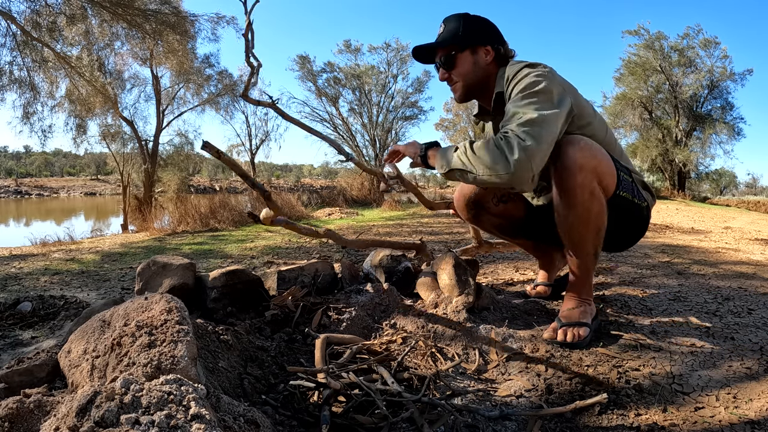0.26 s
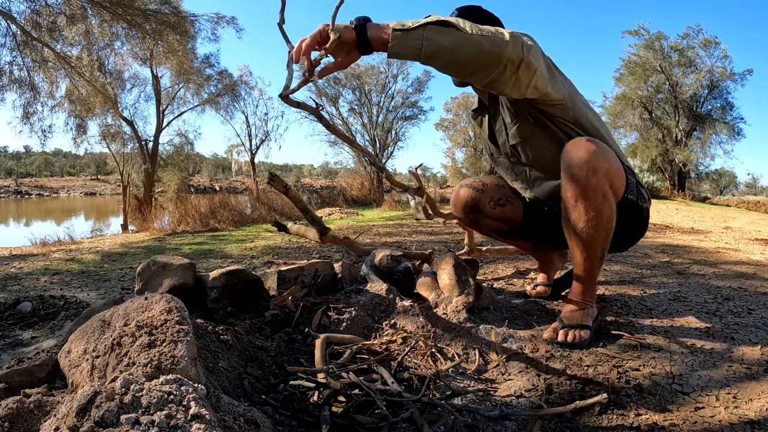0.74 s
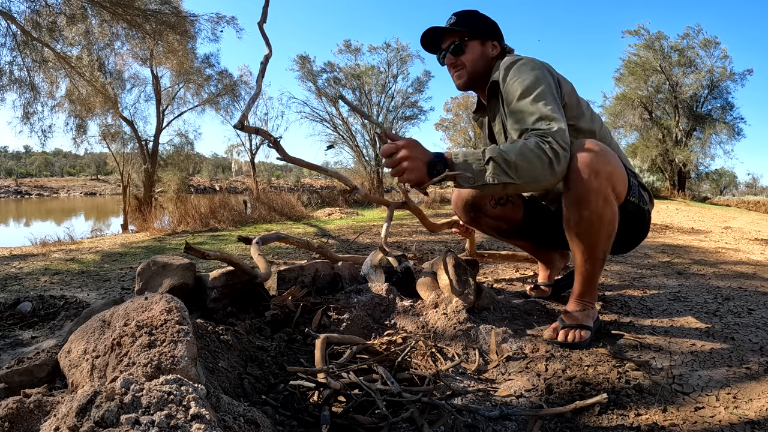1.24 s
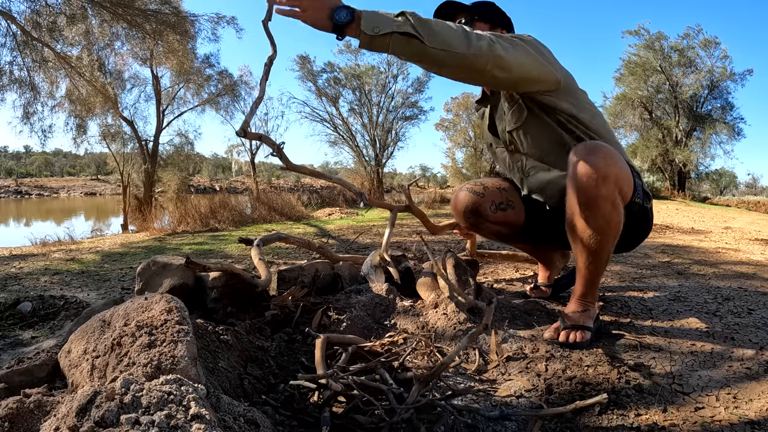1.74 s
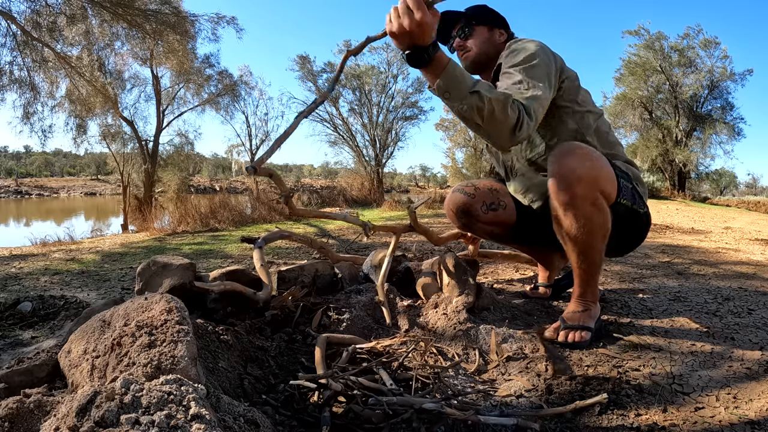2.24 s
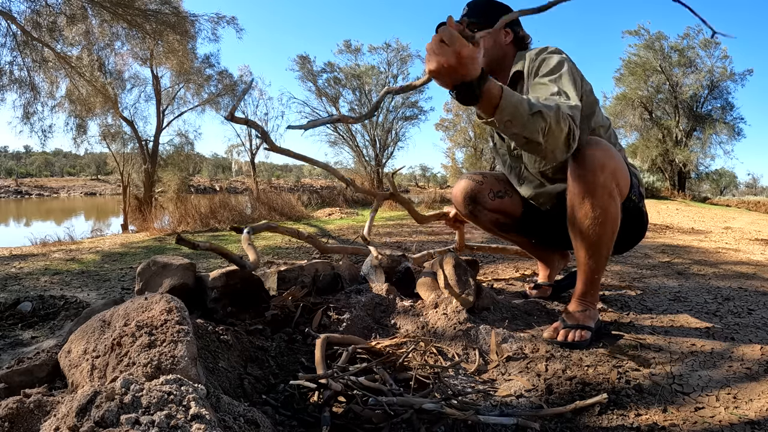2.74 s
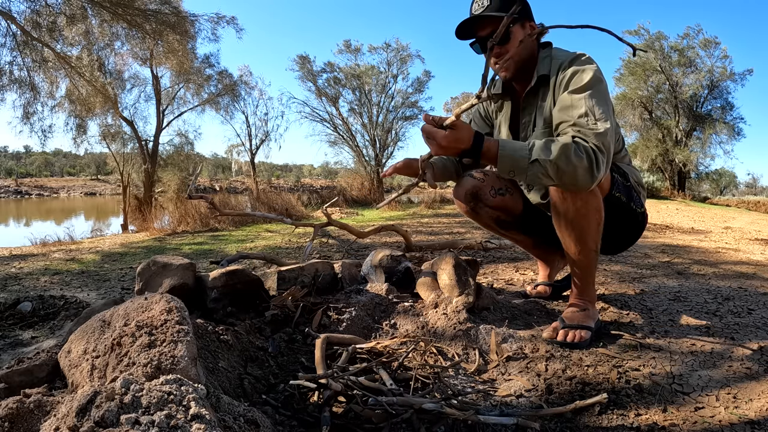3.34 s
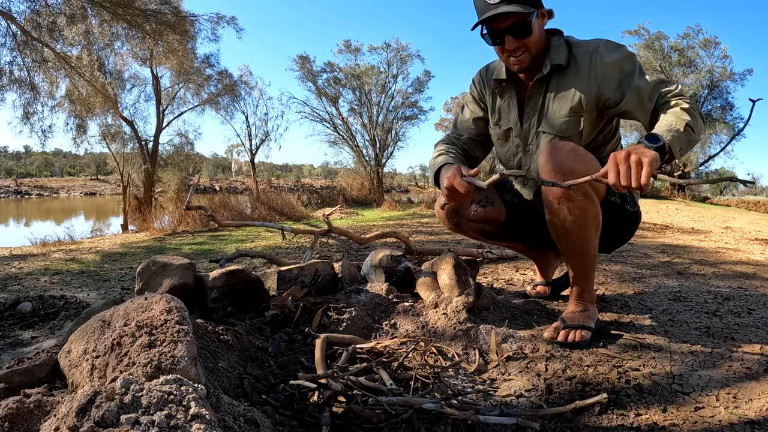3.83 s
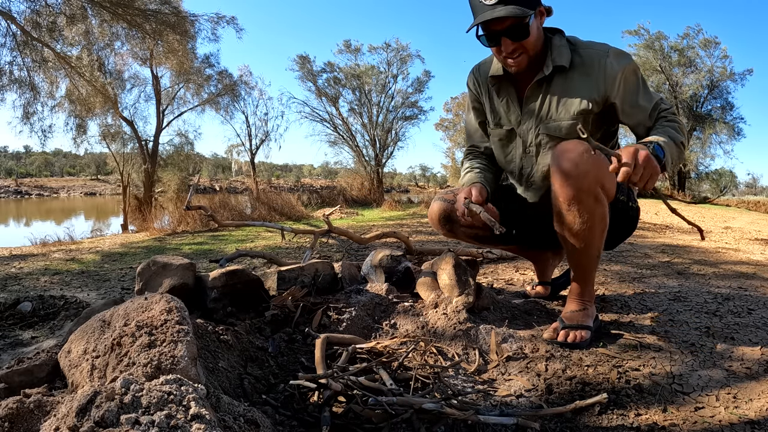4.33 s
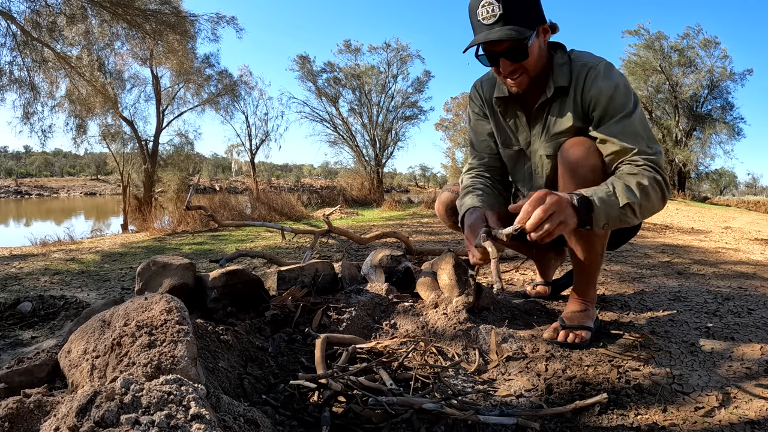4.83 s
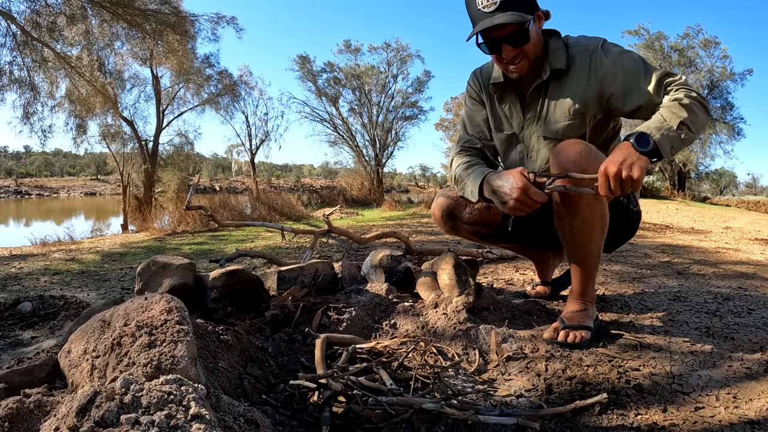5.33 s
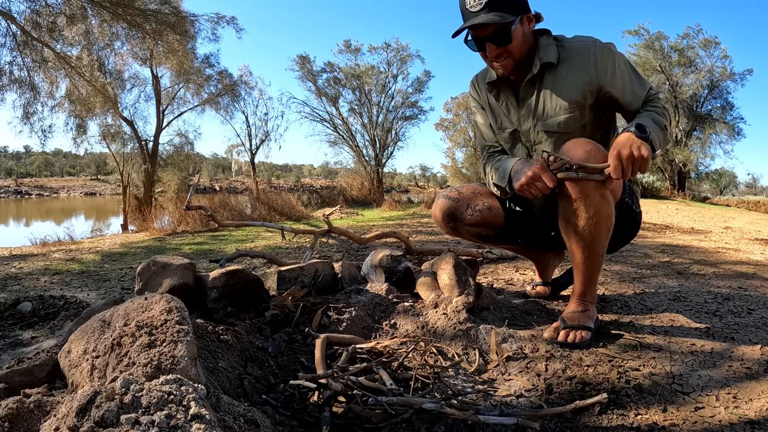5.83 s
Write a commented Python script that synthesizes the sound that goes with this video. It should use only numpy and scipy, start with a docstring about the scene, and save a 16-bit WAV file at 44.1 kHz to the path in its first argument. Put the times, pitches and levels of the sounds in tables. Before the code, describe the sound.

Dry sticks snap and rustle beside a stone fire pit outdoors, sharp cracks over dull thuds, a low ground rumble and quiet air.

```python
"""Sharp cracks of dry wood and rustling bark stand out over dull thuds, a low rumble and quiet open air.
Sticks are pulled over the ground, snapped and dropped into a stone fire pit, close to a small camera.
Noise bursts make the cracks, clumped clicks the rustle and scraping, and resonances ring the wood and ground.
The loudest cracks overload the microphone, which answers with a low push."""
import sys
import numpy as np
from scipy import signal
from scipy.fft import rfft, irfft, next_fast_len
from scipy.io import wavfile
from scipy.ndimage import uniform_filter1d

SR = 44100
rng = np.random.default_rng(int(sys.argv[2]) if len(sys.argv) > 2 else 0)


def waveform_to_disk(signal):
    """Save audio, clipped to [-1, 1], as 16-bit WAV at the path in sys.argv[1]."""
    frames = np.transpose(np.atleast_2d(signal))
    scaled = np.clip(frames, -1, 1) * 32767
    samples = np.round(scaled).astype(np.int16)
    wavfile.write(sys.argv[1], SR, samples)


def level_to_linear(level):
    """Convert decibel levels to linear amplitude factors, elementwise."""
    exponent = np.asarray(level, float) / 20
    return 10 ** exponent


N = 267819  # length in samples

# How busily the wood is handled, a bed under the single strokes and slides.
# Each row: time in seconds, relative level in dB.
BUSY = [(.56, -88), (.6, -66), (1.45, -68), (1.58, -58.5), (2.05, -56.5), (2.42, -61), (2.72, -56),
        (2.9, -59.5), (2.97, -80), (3.17, -75.5), (3.3, -59), (3.4, -73), (3.44, -57), (3.72, -59),
        (3.82, -68), (4.15, -71), (4.6, -66), (5.06, -75), (5.15, -64), (5.62, -69), (5.72, -58)]


def evened(x):
    """Scales a signal to an rms of 1."""
    return x / np.sqrt(np.mean(x ** 2) + 1e-20)


def smooth_patches(x, rows, columns):
    """Averages a random grid over so many rows and columns, leaving soft patches of rms 1."""
    return evened(uniform_filter1d(uniform_filter1d(x, size=rows, axis=0), size=columns, axis=1))


def read(points, hz):
    """Reads a table of (Hz, value) at any frequencies, with straight lines over log frequency."""
    f, value = np.transpose(points)
    return np.interp(np.log(hz + 1), np.log(f + 1), value)


def curves(rows):
    """Turns each column of a time table into a curve with one value a sample."""
    s, *columns = np.transpose(rows)
    return [np.interp(np.arange(N) / SR, s, c) for c in columns]


def add(mix, s, sound):
    """Mixes a sound in at s seconds."""
    part = mix[round(s * SR):][:len(sound)]
    part += sound[:len(part)]


def colour(x, points):
    """Filters to a spectrum given as (Hz, dB), with no sound ahead of its cause (minimum phase)."""
    log_gain = np.log(level_to_linear(read(points, abs(np.fft.fftfreq(4096, 1 / SR)))))
    taps = np.fft.ifft(np.exp(np.conj(signal.hilbert(log_gain)))).real[:2048]
    taps = taps.reshape((1,) * (x.ndim - 1) + (-1,))
    return signal.oaconvolve(x, taps, axes=-1)[..., :x.shape[-1]]


def resonate(x, hz, width):
    """A resonance with a gain of about 1 at its pitch; a narrower width in Hz rings longer."""
    pole = np.exp((2j * np.pi * hz - np.pi * width) / SR)
    return 2 * signal.lfilter([1 - abs(pole)], [1, -pole], x).real


def grains(per_s, spread_db, clump_db):
    """Random clicks of uneven size that get larger and smaller in clumps, rms 1."""
    clumps = evened(uniform_filter1d(rng.standard_normal(N), size=250))
    size = level_to_linear(spread_db * np.minimum(rng.exponential(1, N), 5) + clump_db * clumps)
    return evened(size * rng.choice([-1., 1.], N) * (rng.random(N) < per_s / SR))


def swells(rows):
    """Gain of strokes (peak s, dB, s to rise 20 dB, s to fall 20 dB), straight in dB; powers add."""
    t, power = np.arange(0, N + 32, 32) / SR, 1e-12
    for s, db, rise, fall in rows:
        power = power + level_to_linear(db - 20 * np.maximum((s - t) / rise, (t - s) / fall)) ** 2
    return np.interp(np.arange(N) / SR, t, np.sqrt(power))


def air():
    """Quiet open air: noise with drifting patches of level, partly shared by both microphone ports."""
    # Spectrum of the air. Each row: frequency in Hz, relative level in dB per Hz.
    spectrum = [(18, 0), (34, 8), (56, -14), (80, -24), (118, -18), (150, 5), (649, -18), (1350, -8.5),
                (3300, -28), (5300, -18), (10500, -31.5), (13000, -29.5), (15000, -62)]
    # How alike left and right are. Each row: frequency in Hz, likeness from 0 to 1.
    likeness = [(60, 0.992), (240, 0.51), (950, 0.29), (3770, 0.51), (15000, 0.68)]
    frames, hz = N // 256 + 5, np.fft.rfftfreq(1024, 1 / SR)
    a, b, c, d, grid = rng.standard_normal((frames, 513, 5)).T
    patches = smooth_patches(grid, 12, 14)
    drift = smooth_patches(patches, 50, 50)  # slow, broad shifts
    same = np.clip(read(likeness, hz), -1, 1)[:, None]
    left = a + 1j * b
    right = same * left + np.sqrt(1 - same ** 2) * (c + 1j * d)
    z = np.array([left, right])
    z *= level_to_linear(read(spectrum, hz)[:, None] + 1.6 * patches + 2.2 * drift)
    return level_to_linear(-64) * evened(signal.istft(z, nperseg=1024, noverlap=768)[1][:, :N])


def rumble():
    """The dragged branch shakes the ground: noise swings two modes of the camera's seat fairly evenly."""
    # Modes of the camera on the ground. Each row: frequency in Hz, width of the first resonance in Hz.
    modes = [(40, 24), (73, 10)]
    # Shakes of the ground. Each row: peak time in seconds, low mode level in dB, high mode level in dB,
    # seconds to rise 20 dB, seconds to fall 20 dB.
    shakes = [(.13, -43, -71, 0.25, .3), (.42, -47, -43, 0.21, 0.32), (.7, -35, -43, 0.16, 0.3771),
              (.94, -42, -46, 0.25, .5), (1.14, -35, -41, 0.22, 0.3222), (1.32, -39, -41, 0.29, 0.29),
              (1.5, -48, -44, 0.35, 0.2129), (1.9, -54, -46, .09, .16), (2.38, -45, -44, 0.21, 0.5),
              (2.64, -39, -38.5, 0.58, 0.54), (2.83, -39, -40.5, 0.28, 0.0528),
              (3.43, -35.5, -45.5, 0.1372, 0.626), (3.72, -39, -42, .6, 0.2866),
              (4.2, -45.5, -64.5, .02, 0.2125), (5.88, -50.5, -72, 0.27, 0.38)]
    noise = rng.standard_normal((2, 2, N))
    out = np.zeros((2, N))
    for k, ((hz, width), pair) in enumerate(zip(modes, noise)):
        shared, opposed = (evened(resonate(resonate(v, hz, width), hz, 2.9 * width)) for v in pair)
        envelope = abs(signal.hilbert(shared, next_fast_len(N))[:N])
        shared = evened(shared / (envelope + 0.16) ** .7)  # evens out the swing
        level = swells([(s, db[k], rise, fall) for s, *db, rise, fall in shakes])
        # the right port feels more
        out += level * np.array([0.795 * shared + .14 * opposed, 1.085 * shared - .14 * opposed])
    return out


def rustle(breaks):
    """Dense tiny scrapes of bark, their colour shifting; the second row reaches the ports unalike."""
    # Bark and twigs rubbing. Each row: peak time in seconds, relative level in dB,
    # seconds to rise 20 dB, seconds to fall 20 dB.
    rubs = [(0.001, -54, 1.25, 0.31), (.27, -53, 0.1035, 0.14), (.73, -44.5, 0.0557, 0.0937),
            (.791, -41, 0.1033, 0.0271), (.945, -33.5, 0.0222, 0.0649), (.965, -36.5, 0.0955, 0.0151),
            (1.031, -38, 0.018, 0.16), (1.142, -34.5, 0.0172, 0.03), (1.25, -53, 0.0674, 0.15),
            (1.325, -50.5, 0.0333, .08), (1.43, -51, 0.127, 0.03), (1.709, -38.5, .018, 0.1027),
            (1.805, -40, 0.0379, 0.1356), (2.132, -42, 0.1521, 0.13), (2.475, -31.5, 0.0295, 0.0415),
            (2.569, -38, 0.0333, 0.0439), (3.369, -48.5, 0.182, 0.017), (3.537, -49, 0.14, .21),
            (3.737, -50.5, 0.34, 0.0568), (4.18, -38, 0.0186, 0.03), (4.74, -43, 0.0118, 0.0471),
            (4.766, -44.5, 0.0327, .03), (4.93, -50, 0.1025, 0.0336), (5.215, -47, 0.06, 0.1029),
            (5.293, -42, 0.0256, 0.0663), (5.934, -45, 0.025, 0.06)]
    # Spectrum of the rustle. Each row: frequency in Hz, gain in dB.
    spectrum = [(400, -37.5), (800, -18.5), (1200, -6), (3000, -4), (5000, -3), (7000, -5.5), (10800, -13),
                (13500, -25), (15500, -52)]
    # How thick the rubbing twigs are. Each row: time in seconds, gain of the lower rustle in dB.
    thickness = [(0, 2.5), (.8, -1), (.95, -8), (1.04, -1.5), (1.35, 5), (1.7, -3), (2.1, 2.5), (2.95, 4),
                 (4.25, -3), (5.0, 7.5), (5.2, -1), (5.35, 3), (5.5, -4)]
    thick_hz = 2800  # the thickness gain fades out around here
    flakes = np.diff(grains(240, 3.5, 2.5), prepend=0)  # single bark flakes pop thinly
    alike = grains(8000, 4.0, 3.3) + 0.37 * flakes
    rows = np.array([alike, .28 * grains(11000, 2.3, 2.6)])
    # bark crumbs rustle after each crack
    delay_s, debris_db, rise_s, fall_s = 0.0089, -38.5, .008, .04
    debris = [(c[0] + delay_s, c[1] + debris_db, rise_s, fall_s) for c in breaks]
    level = np.hypot(swells(rubs + debris), level_to_linear(curves(BUSY)[0]))
    hz, t, z = signal.stft(colour(rows * level, spectrum), SR, nperseg=256)
    low_share = 1 / (1 + (hz / thick_hz) ** 4)
    z = z * level_to_linear(np.outer(low_share, np.interp(t, *np.transpose(thickness))))
    patches = smooth_patches(rng.standard_normal(z.shape[1:]), 10, 7)
    return level_to_linear(7.5) * signal.istft(z * level_to_linear(3.1 * patches), nperseg=256)[1][:, :N]


def scrape():
    """Slower slips of heavy wood ring its hollow middle range; a bent branch groans once."""
    # Slides of thick wood. Each row: peak time in seconds, relative level in dB,
    # seconds to rise 20 dB, seconds to fall 20 dB.
    slides = [(.75, -48, .15, 0.117), (1.07, -40, .08, .08), (2.22, -50.5, .21, 0.277),
              (2.65, -41, .03, .06), (3.425, -52.5, .11, 0.093)]
    heavy_db = -8  # thick wood in the busy bed, relative to bark
    slips = grains(3000, 4.1, 2.4) * np.hypot(swells(slides), level_to_linear(curves(BUSY)[0] + heavy_db))
    wood = 1.1 * resonate(resonate(slips, 760, 420), 760, 420) + 0.82 * resonate(slips, 1210, 390)
    creak = (2.81, -59, .05, .11)  # the groan, same columns as the slides
    groan = swells([creak]) * evened(resonate(grains(4000, 2.0, 2.5), 750, 200))
    body = 3.45 * resonate(resonate(slips, 170, 260), 170, 260)
    return level_to_linear(10.0) * (wood + groan + body)


def thuds():
    """A dull blow: a gritty push rings one mode at the listed pitch and a broad woody band around 270 Hz."""
    # Branches knocking ground and stones. Each row: start in seconds, level in dB,
    # pitch of the mode in Hz, time in which it falls by 60 dB in seconds.
    knocks = [(0.259, -34.5, 190.4, 0.075), (0.585, -26, 169.5, 0.09), (1.074, -36, 640, 0.03),
              (1.812, -42.5, 223, 0.09), (2.171, -32, 182.5, 0.04), (2.283, -35, 170.4, 0.11),
              (2.458, -30, 420, .03), (2.482, -26, 190, 0.06), (2.577, -31, 200, 0.06),
              (3.052, -50, 570, .07), (3.27, -37, 299, 0.022), (3.293, -37, 190, .05),
              (3.334, -28, 165, 0.06), (3.421, -25, 95, 0.073), (3.424, -23, 380, .028),
              (3.71, -37.5, 139.5, 0.08), (5.784, -38, 450, 0.012)]
    out, t = np.zeros(N), np.arange(9000) / SR
    for (s, db, hz, t60), noise in zip(knocks, rng.standard_normal((len(knocks), len(t)))):
        blow = (.6 + noise) * t * np.exp(-t / 0.004)
        gritty = blow + .0004 * noise * np.exp(-t / .025)  # soil settles
        mode = resonate(gritty, hz, 2.2 / t60)
        wood = resonate(resonate(gritty, 270, 340), 270, 340)
        add(out, s, level_to_linear(db) * (mode / abs(mode).max() + 0.38 * wood / abs(wood).max()))
    return out


def blows():
    """Lists the cracks and the ticks of thin twigs and flakes; each tick has its own pitch and length."""
    # Cracks of wood. Each row: start in seconds, level in dB, length in seconds,
    # ring of the stick relative to the crack level in dB, ring pitch in Hz.
    large = [(.5838, -28.5, 0.0077, -15, 850), (.793, -23, 0.0347, -15.5, 2406),
             (1.046, -36.5, 0.0205, 5.5, 989), (1.1245, -25.5, 0.041, -10, 1932),
             (1.1399, -19.5, 0.0134, -22.5, 5940), (1.1813, 2.5, 0.01547, -17, 3700),
             (1.325, -33, 0.0143, -10, 7000), (1.4186, -29, 0.0248, -11.5, 2544),
             (1.5349, -44.5, 0.0138, 1.5, 2161), (1.6993, -28, 0.039, -14.5, 1500),
             (1.7091, -13.5, 0.0181, -28.5, 6230), (1.794, -24, 0.031, -25.5, 5670),
             (1.9778, -14, .016, -19, 1240), (2.1292, -25.5, .042, -6, 2600),
             (2.1336, -19, 0.0184, -13.5, 1066), (2.1651, -24, .033, -10, 2287),
             (2.2141, -16.5, 0.0164, -14.5, 1075), (2.224, -6.5, 0.0101, -18, 1250),
             (2.241, -24.5, 0.0213, -19, 1020), (2.2939, -26.5, 0.0213, -17.5, 910),
             (2.457, -1, 0.0311, -17.5, 6650), (2.5324, -25, 0.021, -15.5, 1920),
             (2.5665, -28.5, .026, -1, 2493), (2.6278, -9, 0.0152, -9.5, 3903),
             (2.6282, -23, .021, 10, 1770), (2.631, -32.5, 0.0465, 9, 1096), (2.632, -36, 0.0372, 11, 1290),
             (2.8022, -29, 0.02, -17, 1600), (2.913, -29, 0.0352, -18, 2550), (2.9556, -34, 0.018, 2, 2256),
             (2.957, -42, .024, 10, 1253), (3.0504, -20.5, 0.022, -10, 5200), (3.052, -34, 0.026, 8, 1700),
             (3.2717, -21, 0.0168, -17.5, 832), (3.2911, -31.5, 0.058, -10.5, 2405),
             (3.3295, -33.5, 0.027, -10.5, 1906), (3.4111, -26.5, 0.0248, -8.5, 1570),
             (3.6448, -32, 0.0217, -10.5, 1952), (3.9152, -29, 0.0188, -17.5, 3082),
             (4.1733, -12.5, 0.0289, -22, 5640), (4.1865, -1.5, 0.01503, -13, 2480),
             (4.2217, -26.5, 0.0228, -9.5, 2560), (4.7335, -34.5, 0.0219, -2, 1205),
             (4.7426, -33.5, 0.028, 3, 1246), (4.7897, -39.5, 0.0124, -3, 1230),
             (5.0895, -27, 0.0117, -17.5, 3110), (5.2119, -26, 0.0206, -19, 6200),
             (5.2911, -31.5, 0.047, -15.5, 2435), (5.3315, -35.5, 0.0254, -9.5, 1620),
             (5.428, -49, 0.013, 1.5, 1897), (5.755, -6, 0.0081, -20, 5210),
             (5.772, -19, 0.0078, -24, 4510), (5.779, -26, 0.022, -13.5, 944),
             (5.8464, -8, 0.0137, -21, 4050), (5.8525, -19, 0.0126, -14, 2000),
             (5.878, -31.5, 0.04, -14, 2540), (5.8842, -7.5, 0.0136, -27, 7840),
             (5.912, -11, 0.017, -17.5, 5910), (5.9561, -30.5, 0.0202, -12.5, 1190),
             (6.001, -28.5, 0.0353, -10.5, 3190), (6.0261, -3, 0.0068, -18.5, 3670),
             (6.0358, -10, 0.022, -16.5, 3895), (6.0486, -24, 0.05, -13.5, 2530),
             (6.0558, -14, .03, -22, 5650), (6.0665, -18.5, 0.0133, -19, 6000)]
    # Thin twigs and bark flakes ticking. Each row: start in seconds, level in dB.
    small = [(.3496, -46), (.6749, -37), (.7327, -32), (.909, -27), (1.0316, -28), (1.0862, -30),
             (1.259, -42), (1.306, -33), (1.373, -36), (1.478, -42), (1.5818, -39), (1.6292, -41),
             (1.66, -41), (1.8492, -33), (1.8746, -31), (1.8945, -30), (2.0143, -35), (2.0837, -33),
             (2.258, -36), (2.3211, -25), (2.3777, -30), (2.676, -31), (2.7003, -34), (2.7217, -37),
             (2.8489, -35), (2.8729, -38), (3.0021, -33), (3.0094, -35), (3.1847, -42), (3.497, -37),
             (3.5279, -38), (3.7264, -35), (3.8821, -43), (3.93, -43), (3.9993, -44), (4.245, -40),
             (4.723, -46), (4.8958, -40), (4.9733, -41), (5.161, -36), (5.689, -38), (5.698, -31),
             (5.712, -37), (5.7475, -29), (5.8155, -30), (5.827, -35), (5.902, -30), (5.9336, -23),
             (5.9833, -32)]
    length_s, ring_db, pitch_hz = .016, -22, 5200  # typical tick, before the random spread
    spread = np.exp(.3 * rng.standard_normal((len(small), 2)))
    return large + [(s, db, length_s * a, ring_db, pitch_hz * b) for (s, db), (a, b) in zip(small, spread)]


def cracks(rows):
    """A sharp snap, then fibres tear in a short burst that also rings the stick."""
    # Spectrum of a crack before its tilt. Each row: frequency in Hz, gain in dB.
    spectrum = [(300, -37.5), (800, -17), (2400, -3.5), (4400, 0.5), (7400, -2), (8700, -12), (10000, -5.5),
                (12000, -12.5), (14500, -28), (16000, -60)]
    # Ringing modes of a stick. Each row: multiple of the ring pitch, level in dB,
    # relative ring length in seconds (scaled below).
    modes = [(1., 5.5, 0.022), (1.09, -1, .018), (.57, -14, 0.02), (1.85, -13.5, 0.018)]
    bright_hz, duller_hz_per_db = 4500, 60  # thick sticks ring more and sound duller
    thin_hz = 2800  # a twig that rings above this also cracks at that pitch
    tear_share, tear_stop = 0.623, 2.2  # fibres tear evenly, then stop short: share of length, steepness
    out, t = np.zeros(N), np.arange(5000) / SR
    for (s, db, t60, ring_db, ring_hz), noise in zip(rows, rng.standard_normal((len(rows), 2, len(t)))):
        hz = (bright_hz - duller_hz_per_db * ring_db) * np.exp(0.11 * noise[1, -1])
        hz = ring_hz if ring_hz > thin_hz else hz

        snap = 0.82 * np.exp(-t / 0.00055)
        tear = .6 * level_to_linear(-60 * (t / (tear_share * t60)) ** tear_stop)
        tail = .25 * level_to_linear(-60 * t / t60)
        scatter = level_to_linear(-36.5 - 60 * t / 0.049)  # off the stones
        fall = np.minimum(t / 0.00014, 1) * (snap + tear + tail + scatter)
        spurts = 0.16 + abs(uniform_filter1d(noise[1], size=12)) * 6.7
        tearing = noise[0] * spurts * fall

        tilt = -0.1267 * (ring_db + 17)  # dB an octave: thin twigs crack brighter
        burst = colour(tearing, [(f, g + tilt * np.log2(f / 4000)) for f, g in spectrum])
        burst = burst + 1.1 * resonate(burst, hz, 0.13 * hz)
        burst /= np.sqrt((burst ** 2).sum() / (t60 * SR))

        # a gripped or lightly knocked stick rings weak and short
        free = np.clip((ring_db + 22) / 18, .25, 1) * min(1, t60 / .03)
        damping = 1.4 * max(1, ring_hz / thin_hz) ** 2 / free
        ring = sum(level_to_linear(g) * resonate(tearing, k * ring_hz, damping / d) for k, g, d in modes)
        add(out, s, level_to_linear(db - 18.0) * burst + level_to_linear(db + ring_db) * ring / abs(ring).max())
    return out


def ports(near):
    """The sound moves with the hands; the left port differs from the right in level and phase."""
    # Where the hands work. Each row: time in seconds, left minus right in dB,
    # treble gain in dB (lower when the body shades the wood).
    hands = [(0, -1.5, -4.5), (.8, 1, 3), (2.1, 0.5, 1.5), (2.65, 0, -7), (3.6, 0.5, -5.5), (4.2, -4, 5),
             (4.8, -1.5, 6.5), (5.4, -4, 4.5), (6.07, -3, 1)]
    # Left port relative to the right. Each row: frequency in Hz, level in dB, phase in radians.
    difference = [(300, -2, -.12), (3200, -1, -.6), (9000, 0, -.25), (13000, 4, -1.)]
    pan_db, treble_db = curves(hands)
    treble = signal.sosfilt(signal.butter(2, 7000, "high", fs=SR, output="sos"), near)
    near = near + (level_to_linear(treble_db) - 1) * treble
    size = next_fast_len(N)
    hz = np.fft.rfftfreq(size, 1 / SR)
    gain = level_to_linear(read([p[:2] for p in difference], hz))
    turn = np.exp(1j * read([p[::2] for p in difference], hz))
    left = irfft(rfft(near, size) * gain * turn, size)[:N]
    return np.array([left * level_to_linear(pan_db / 2), near * level_to_linear(-pan_db / 2)])


def scene():
    """All sources as they reach the camera, left and right."""
    breaks = blows()
    alike, unalike = rustle(breaks)
    near = cracks(breaks) + thuds() + scrape() + alike
    return ports(near) + unalike * [[1], [-1]] + rumble() + air()


def top_cut(x):
    """Nothing passes above the cut-off."""
    return signal.sosfilt(signal.butter(12, 16380, fs=SR, output="sos"), x)


def record(dry):
    """Overload shifts the microphone input into a slowly recovering negative push, then it clips."""
    keep = np.exp(-1 / (0.00157 * SR))  # smoothing over 1.57 ms
    power = signal.lfilter([1 - keep], [1, -keep], np.minimum(dry ** 2, 1).mean(0))
    push = signal.lfilter([1 - keep], [1, -keep], np.tanh(level_to_linear(38.5) * power ** 2))
    push -= signal.lfilter([1 - keep ** .05], [1, -keep ** .05], push)  # the input blocks steady pressure
    clipped = np.clip(dry - np.array([[.3], [.6]]) * push, -1, 1)  # the right is pushed harder
    top_end = signal.butter(6, 15000, fs=SR, output="sos")  # the microphone's top end
    mix = signal.sosfilt(top_end, clipped)
    return top_cut(mix)


dry = scene()
out = record(dry)
waveform_to_disk(out)
```